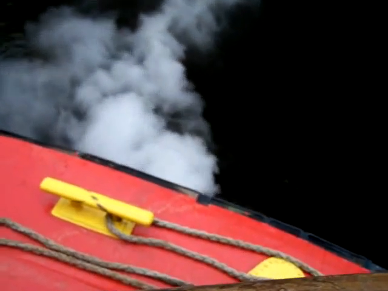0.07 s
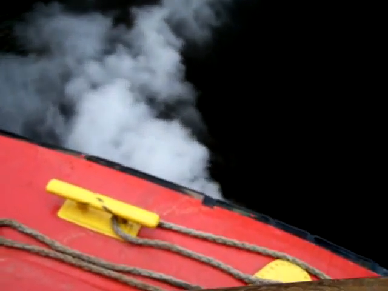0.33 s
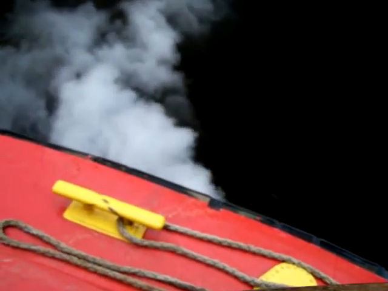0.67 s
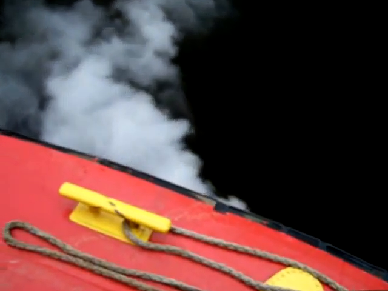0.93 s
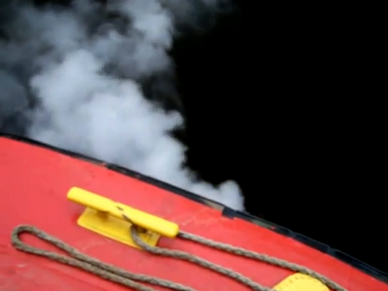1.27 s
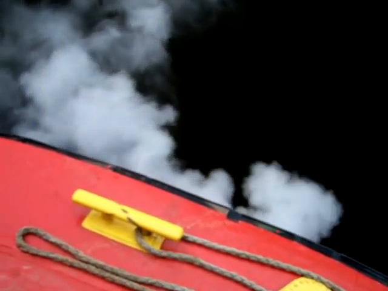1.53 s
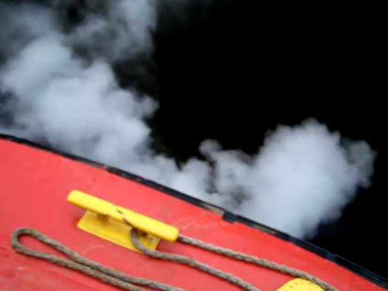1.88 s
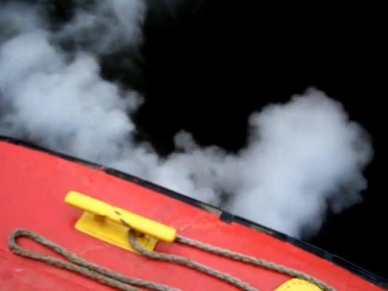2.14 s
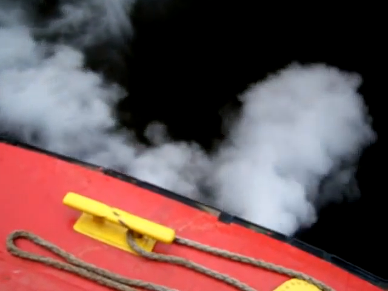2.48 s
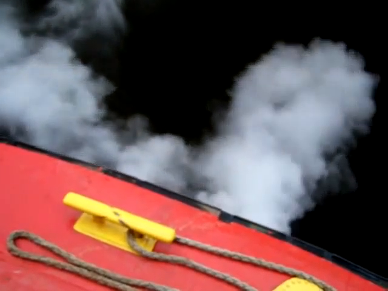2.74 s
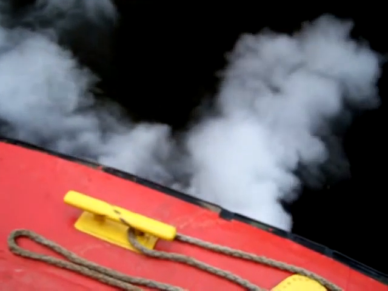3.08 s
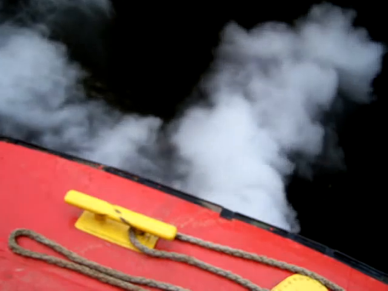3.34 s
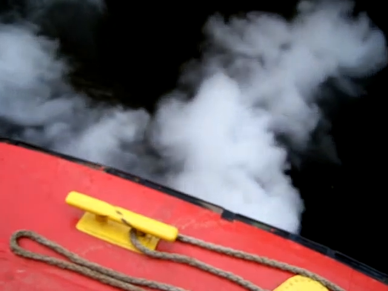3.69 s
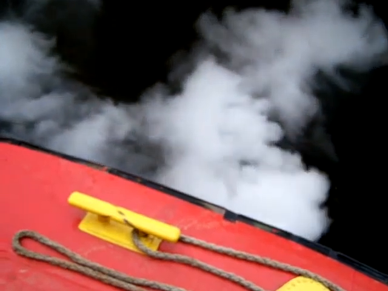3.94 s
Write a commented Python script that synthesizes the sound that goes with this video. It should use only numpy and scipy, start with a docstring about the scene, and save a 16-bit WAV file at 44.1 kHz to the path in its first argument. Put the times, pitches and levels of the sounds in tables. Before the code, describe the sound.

A continuous hissing, churning blast of steam at the water, with boat machinery droning underneath.

```python
"""A jet of steam blows from the side of a boat, just above the water, without a pause.
It roars as it churns at the water, and hisses with spray.
Machinery hums underneath, with two low drones that boom and a faint whine from a fast shaft.
Midway the boom thins and a second gush brightens the hiss; then the outlet adds a breathy whistle."""
import sys
import numpy as np
from scipy import signal
from scipy.fft import rfft, irfft
from scipy.io import wavfile
from scipy.ndimage import uniform_filter1d

SR = 44100
rng = np.random.default_rng(int(sys.argv[2]) if len(sys.argv) > 2 else 0)


def master(y):
    """Save y as 16-bit WAV."""
    cut = np.clip(np.atleast_2d(y).T, -1, 1)
    pcm = np.round(cut * 32767)  # scale
    wavfile.write(sys.argv[1], SR, pcm.astype(np.int16))


N = 176400
T, HZ = np.arange(N) / SR, np.fft.rfftfreq(N, 1 / SR)

# loudness of the machinery's boom (t/s, level/dB)
BOOM_LEVEL = [(0.0, -15), (0.18, -19), (0.42, -18), (0.5, -14), (0.7, -19.5), (0.86, -20), (1.0, -16),
              (1.08, -20.5), (1.27, -19), (1.75, -23.5), (2.2, -22), (2.29, -26), (2.35, -19.5),
              (2.48, -16.5), (2.54, -21.5), (2.88, -18.5), (2.96, -22.5), (3.1, -16.5), (3.34, -21.5),
              (3.48, -16.5), (3.56, -21.5), (3.8, -18.5), (3.9, -21)]
# the two machinery drones that boom (f/Hz, width/Hz, level/dB)
BOOM_DRONES = [(146, 14, 0), (171.7, 13.3, -2.5)]
# loudness of the low roar (t/s, level/dB)
ROAR_LEVEL = [(0.0, -26.5), (0.2, -18.5), (0.62, -25), (0.76, -17), (0.88, -23.5), (1.08, -18),
              (1.21, -21.5), (1.33, -18.5), (1.5, -23.5), (1.8, -26), (2.3, -21), (2.45, -21.5),
              (2.56, -30), (2.64, -20.5), (2.88, -23.5), (3.2, -21.5), (3.4, -24.5), (3.68, -21.5),
              (3.99, -26)]
# tone colour of the low roar (f/Hz, level/dB)
ROAR_COLOUR = [(150, -24), (200, -11), (222, -3.5), (252, -4.5), (285, -2.5), (332, -3), (346, -4),
               (378, -11), (470, -16.5), (800, -57)]
# loudness of the mid-pitched churning (t/s, level/dB)
CHURN_LEVEL = [(0.0, -23.5), (0.56, -22.5), (0.8, -22), (0.92, -23.5), (1.2, -21), (1.28, -23.7),
               (1.52, -23), (1.72, -25.5), (2.6, -23.5), (3.22, -23), (3.4, -20.5), (3.55, -23.5),
               (3.99, -27)]
# tone colour of the churning (f/Hz, level/dB)
CHURN_COLOUR = [(250, -28.5), (400, 0), (480, 0.5), (620, 1), (770, -1), (950, -5), (1400, -26.5),
                (3000, -49)]
# loudness of the deep rumble (t/s, level/dB)
RUMBLE_LEVEL = [(0.33, -32), (0.45, -35), (1.5, -32), (1.76, -44), (2.2, -33.5), (2.92, -37), (3.22, -29),
                (3.99, -43)]
# tone colour of the rumble (f/Hz, level/dB)
RUMBLE_COLOUR = [(8, -16.5), (25, -12.5), (48, 3), (65, 0), (90, 7), (125, -3), (200, -14), (400, -37.5)]
# loudness of the rush around 1 kHz (t/s, level/dB)
RUSH_LEVEL = [(0.0, -24.5), (0.68, -25), (1.4, -24), (1.48, -21.5), (2.12, -22.5), (2.48, -26), (2.6, -23),
              (3.12, -25.5), (3.4, -23), (3.56, -24.5), (3.99, -22.5)]
# tone colour of the rush (f/Hz, level/dB)
RUSH_COLOUR = [(500, -34.5), (800, -1.5), (1000, 3), (1150, 2), (1280, -0.5), (1400, -1), (1550, -3.5),
               (2000, -6.5), (3000, -48.5)]
# loudness of the hiss (t/s, level/dB)
HISS_LEVEL = [(0.0, -24), (0.52, -24.5), (1.0, -24.5), (1.4, -22), (1.52, -20), (1.88, -20), (2.48, -22),
              (2.58, -21.5), (3.56, -22), (3.99, -22)]
# tone colour of the hiss (f/Hz, level/dB)
HISS_COLOUR = [(900, -16.5), (1550, -3.5), (1900, -2), (2300, -1.5), (2800, -0.5), (3300, 0.1),
               (3750, -0.3), (4200, -5), (5000, -15.5), (7000, -49.5)]
# loudness of the high sizzle (t/s, level/dB)
SIZZLE_LEVEL = [(0.0, -31), (1.0, -32.5), (1.96, -27), (2.48, -32.5), (2.6, -30), (2.84, -31.5),
                (3.24, -30), (3.68, -31), (3.99, -30)]
# tone colour of the sizzle (f/Hz, level/dB)
SIZZLE_COLOUR = [(3000, -17.5), (4100, -3), (4600, 0.5), (5100, -2), (5800, -6.5), (6500, -9),
                 (7200, -13.5), (7700, -17), (8200, -35), (9000, -42)]
# tones of the machinery's hum (f/Hz, level/dB)
HUM_TONES = [(58.5, -45.5), (75.6, -37), (120.5, -38.5), (145.3, -34), (290.5, -30.5), (346, -36.5),
             (516, -48.5), (581, -40.5)]
# loudness of the hum, which dips as the gush bursts out (t/s, level/dB)
HUM_LEVEL = [(1.45, 0), (1.75, -5.5), (2.25, -0.5), (3.3, 1), (3.99, -1.5)]
# overtones of the shaft's whine (multiple of the base pitch, level/dB)
WHINE_OVERTONES = [(8, -44), (10, -43.5), (12, -42.5), (13, -43.5), (14, -46), (15, -44.5), (16, -38),
                   (17, -40), (18, -49), (19, -48), (20, -43.5), (21, -45)]
# loudness of the second gush of steam (t/s, level/dB)
GUSH_LEVEL = [(1.3, -48), (1.5, -35), (1.75, -27.5), (1.96, -24), (2.25, -32), (2.5, -46.5), (3.65, -38.5),
              (3.9, -24)]
# resonances of the gush (f/Hz, width/Hz, level/dB)
GUSH_RESONANCES = [(1030, 180, 5), (3690, 700, 3), (4730, 1300, -6.5)]
# loudness of the whistle (t/s, level/dB)
WHISTLE_LEVEL = [(2.45, -43), (2.75, -29.5), (3.3, -30.5), (3.55, -32.5), (4.0, -27)]
# whistling resonances of the outlet (f/Hz, width/Hz, level/dB)
WHISTLE_RESONANCES = [(2560, 220, -6.5), (3070, 80, -1.5), (3780, 160, -9.5)]


def amp(db):
    """Turns decibels into a factor to multiply by."""
    return 10 ** (np.asarray(db) / 20)


def unit(x):
    """Scales a signal to an average power of 1."""
    return x / np.sqrt(np.mean(x ** 2) + 1e-20)


def level(points):
    """Joins (t/s, level/dB) points into a volume curve."""
    return amp(np.interp(T, *np.transpose(points)))


def colour(x, points):
    """Gives x the tone colour of (f/Hz, level/dB) points, at a power of 1."""
    hz, db = np.transpose(points)
    shape = amp(np.interp(np.log(HZ + 1), np.log(hz), db))
    return unit(irfft(rfft(x) * shape, N))


def drift(rate_hz):
    """A smooth random wobble, mostly slower than rate_hz."""
    spectrum = rfft(rng.standard_normal(N)) * (HZ > 0)
    return unit(irfft(spectrum / (1 + (HZ / rate_hz) ** 4), N))


def ringing(resonances):
    """Noise that rings at resonances, the pitches a thing favours."""
    shape = sum(amp(db) / (1 + ((HZ - hz) / (width / 2)) ** 2) for hz, width, db in resonances)
    return unit(irfft(rfft(rng.standard_normal(N)) * shape, N))


def turbulence(depth_db, patch_hz, patch_s):
    """Noise that swells and fades in patches of pitch and time, as swirls come and go."""
    frame, hop = 512, 128
    noise = signal.stft(rng.standard_normal(N), nperseg=frame, noverlap=frame - hop)[2]
    patches = rng.standard_normal(noise.shape)
    patches = uniform_filter1d(patches, max(1, round(patch_hz * frame / SR)), axis=0)
    patches = uniform_filter1d(patches, max(1, round(patch_s * SR / hop)), axis=1)
    patchy = noise * amp(depth_db * unit(patches))
    return signal.istft(patchy, nperseg=frame, noverlap=frame - hop)[1][:N]


def boom(gain_db=-0.8):
    """Two close, low machinery drones boom and throb unevenly against each other."""
    drones = ringing(BOOM_DRONES)
    power = uniform_filter1d(abs(signal.hilbert(drones)) ** 2, size=4500)  # averaged over about 0.1 s
    evened = unit(drones / np.sqrt(power))  # flattens the slow swells
    return amp(gain_db) * level(BOOM_LEVEL) * evened


def roar(rumble_db=-2.0, surge_db=0.5):
    """Steam churns at the water: a low roar, churning and a deep rumble surge together."""
    low = level(ROAR_LEVEL) * colour(rng.standard_normal(N), ROAR_COLOUR)
    swirls = turbulence(depth_db=1.0, patch_hz=298.6, patch_s=0.066)
    churn = level(CHURN_LEVEL) * colour(swirls, CHURN_COLOUR)
    rumble = amp(rumble_db) * level(RUMBLE_LEVEL) * colour(rng.standard_normal(N), RUMBLE_COLOUR)
    return (low + churn + rumble) * amp(surge_db * drift(rate_hz=36))


def spray(drops_per_s=2500, spread_db=2):
    """Drops of spray make tiny clicks at random times, a few louder than the rest."""
    clicks = rng.standard_normal(N) * amp(spread_db * np.minimum(rng.exponential(1, N), 4))
    return unit(clicks * (rng.random(N) < drops_per_s / SR))


def hiss(rush_db=-0.25, hiss_db=-0.9, sizzle_db=-1.17, flutter_db=0.5, spray_gain=0.46):
    """The jet in open air: a rush, a broad hiss and a sizzle with spray all flutter together."""
    swirls = turbulence(depth_db=0.1, patch_hz=350, patch_s=0.066)
    rush = amp(rush_db) * level(RUSH_LEVEL) * colour(swirls, RUSH_COLOUR)
    swirls = turbulence(depth_db=0.5, patch_hz=600, patch_s=0.08)
    broad = amp(hiss_db) * level(HISS_LEVEL) * colour(swirls, HISS_COLOUR)
    fizz = spray_gain * spray() + turbulence(depth_db=0.87, patch_hz=800, patch_s=0.044)
    sizzle = amp(sizzle_db) * level(SIZZLE_LEVEL) * colour(fizz, SIZZLE_COLOUR)
    return (rush + broad + sizzle) * amp(flutter_db * drift(rate_hz=23))


def machinery(base_hz=171.85, whine_db=-1, waver_db=1.5):
    """Machinery hums low and a fast shaft whines high; each tone wavers in loudness."""
    # clocks that run slightly fast and slow make the pitches wander
    hum_time = T + np.cumsum(0.004 * drift(rate_hz=2.44)) / SR
    whine_time = T + np.cumsum(0.00058 * drift(rate_hz=4.3)) / SR
    hum = [(hz * hum_time, amp(db) * level(HUM_LEVEL)) for hz, db in HUM_TONES]
    whine = [(k * base_hz * whine_time, amp(db + whine_db)) for k, db in WHINE_OVERTONES]
    sound = np.zeros(N)
    for cycles, gain in hum + whine:
        waver = amp(waver_db * drift(rate_hz=2.8))
        sound += gain * waver * np.sin(2 * np.pi * (cycles + rng.random()))
    return np.sqrt(2) * sound


def gush():
    """A second plume bursts out midway with a hollow, brighter hiss, and returns at the end."""
    return level(GUSH_LEVEL) * ringing(GUSH_RESONANCES)


def whistle():
    """The outlet rings at a few narrow resonances: a breathy whistle in the second half."""
    return level(WHISTLE_LEVEL) * ringing(WHISTLE_RESONANCES)


def scene():
    """Adds the steam and the machinery into one channel."""
    return (boom() + roar() + hiss() + machinery() + gush() + whistle())[None]


def record(dry):
    """Cuts away the highest treble."""
    cutoff_hz = 8250
    low_pass = signal.firwin(701, cutoff_hz, window=("kaiser", 9), fs=SR)
    return signal.oaconvolve(dry, low_pass[None], "same")


dry = scene()
out = record(dry)
master(out)
```